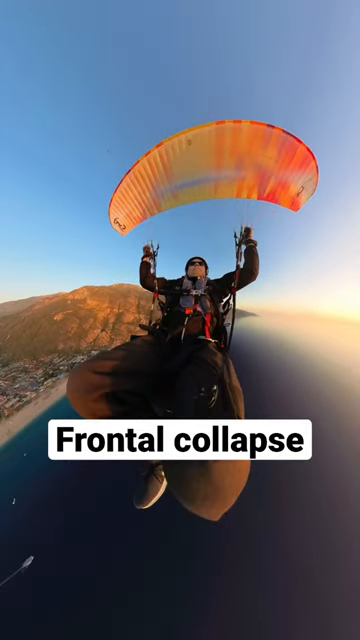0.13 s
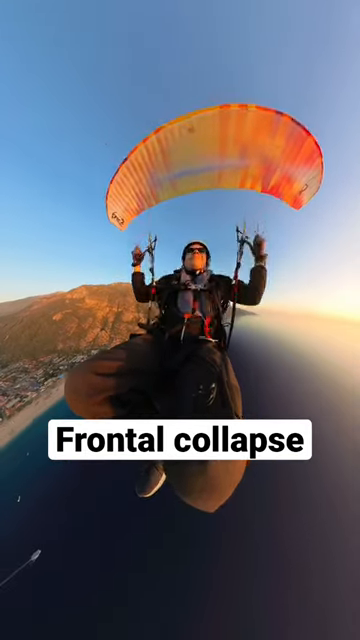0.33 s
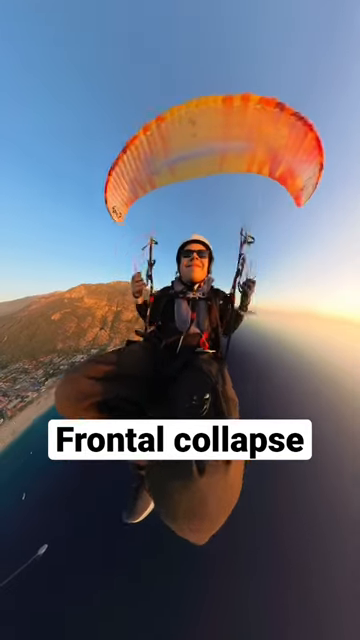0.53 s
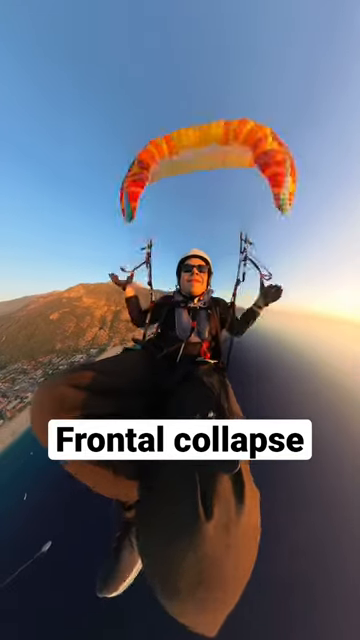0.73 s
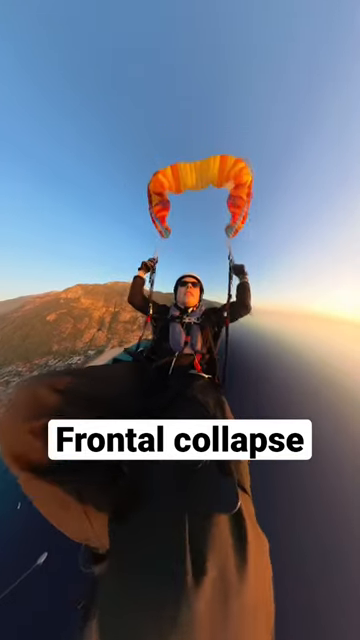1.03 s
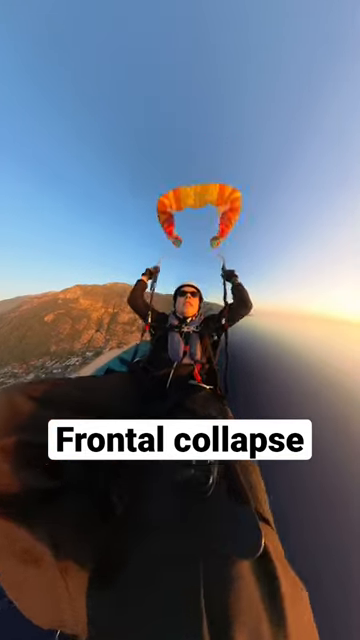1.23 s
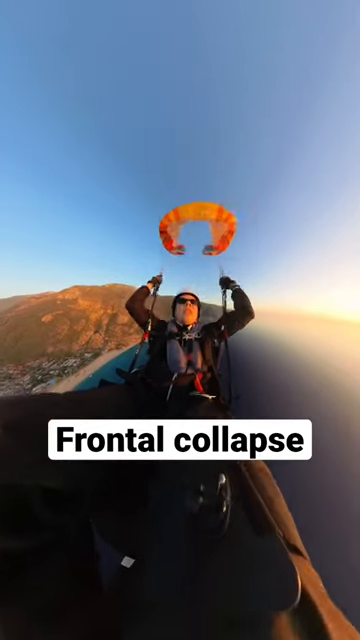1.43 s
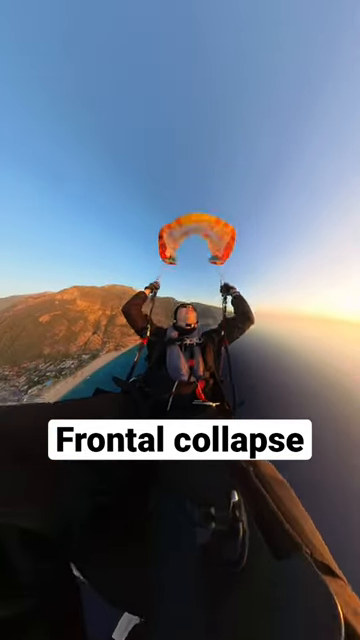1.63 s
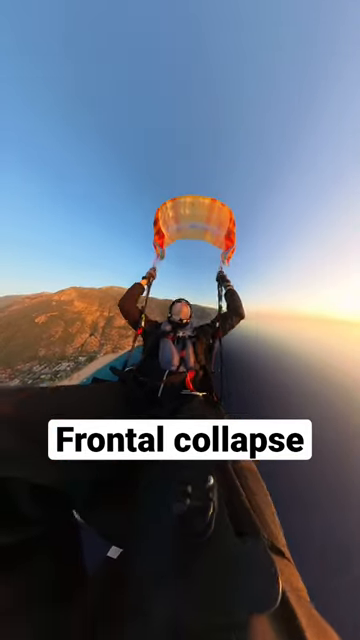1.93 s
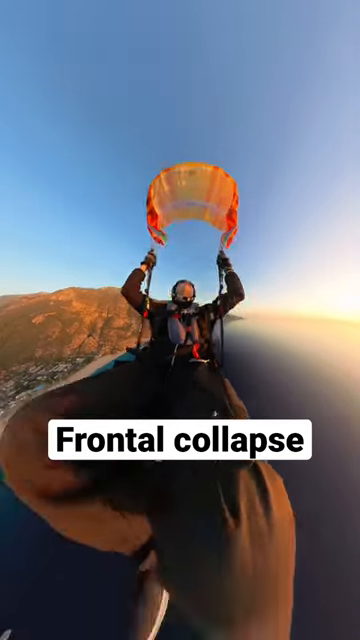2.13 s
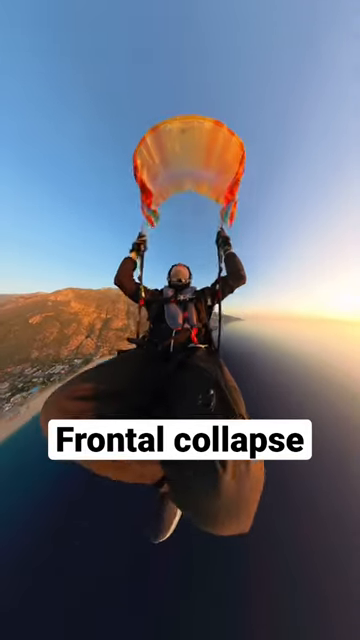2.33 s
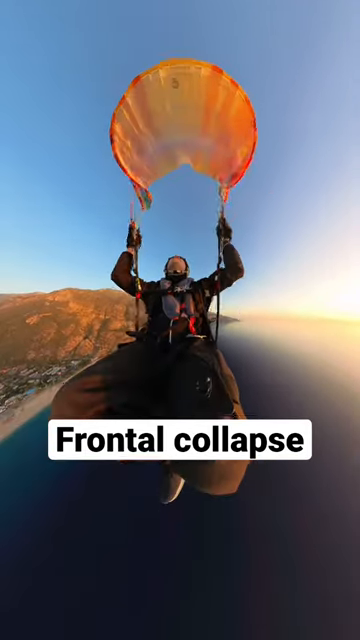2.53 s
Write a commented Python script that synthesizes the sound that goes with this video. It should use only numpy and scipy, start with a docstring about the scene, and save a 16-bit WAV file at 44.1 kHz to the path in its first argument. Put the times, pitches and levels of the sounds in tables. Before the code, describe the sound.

Wind buffets a small microphone throughout, with low rumble, uneven thumps and flutter, its strongest blows rounded off. Short low hums come and go until 0.9 s, with a faint high whistle at 0.6 s and a brief rustle just after. From 0.8 to 1.2 s it turns rough and bright with dense sharp pops. Sparser puffs and pops follow; patchy fabric rustle rises from 1.6 s, strongest 1.9-2.5 s.

```python
"""Wind buffets a small microphone under a paraglider, thumping and fluttering on its port throughout.
Short low hums come and go in the first 0.9 s, with a brief high whistle at 0.6 s and a rustle just after.
From 0.8 to 1.2 s the wind turns rough and bright, crowded with sharp pops; later pops are sparser.
From 1.6 s the wing's fabric rustles in patches overhead as it folds and refills, most from 1.9 to 2.5 s.
Wind is shaped noise and random kicks, puffs are single pressure swings, hums are tones, fabric is hiss."""
import sys
import numpy as np
from scipy import signal
from scipy.fft import rfft, irfft, next_fast_len
from scipy.io import wavfile
from scipy.ndimage import uniform_filter1d, map_coordinates

SR = 44100
rng = np.random.default_rng(int(sys.argv[2]) if len(sys.argv) > 2 else 0)


def voltage_ratio(decibels):
    """Convert decibels (scalar or array-like) to amplitude ratios, 20 dB per decade."""
    exponent = np.asarray(decibels, float) / 20
    return 10 ** exponent


def log_audio(samples):
    """Write samples as a 16-bit WAV file to the path given in sys.argv[1]."""
    # one column per channel
    frames = np.atleast_2d(samples).T
    # limit to full scale, then quantise
    limited = np.clip(frames, -1, 1)
    pcm = np.round(limited * 32767).astype(np.int16)
    wavfile.write(sys.argv[1], SR, pcm)


N = 119070  # length in samples, 2.7 s
CRACK_S = .0015  # spread of one crack, seconds

# How strongly the wind buffets the port.
# Each row: time in seconds, thump level and flutter level in dB, before a fixed trim of each.
WIND_LEVELS = [(0.06, -19, -72), (0.29, -29.5, -31.5), (0.33, -17.5, -38.5), (0.355, -22, -42),
               (0.37, -19.5, -15.5), (0.42, -16.5, -24.5), (0.43, -21.5, -53), (0.55, -23, -40),
               (0.63, -25.5, -32.5), (0.69, -17.5, -22), (0.73, -21.5, -35), (0.82, -18.5, -24.5),
               (0.99, -22.5, -20.5), (1.12, -19, -23.5), (1.15, -31.5, -19), (1.21, -32.5, -34.5),
               (1.26, -21, -44), (1.29, -31, -55), (1.35, -16.5, -19.5), (1.38, -32.5, -81),
               (1.4, -53, -15.5), (1.43, -24.5, -64), (1.49, -26.5, -52), (1.52, -28, -27),
               (1.54, -26, -63), (1.6, -16.5, -30.5), (1.64, -27, -54), (1.65, -24, -45),
               (1.68, -25.5, -35), (1.69, -37, -41), (1.74, -19.5, -36), (1.92, -22, -24),
               (1.99, -25.5, -27.5), (2.0, -31, -37), (2.02, -20.5, -18.5), (2.06, -34.5, -43),
               (2.14, -17.5, -26), (2.24, -33.5, -38), (2.26, -21, -33), (2.29, -51, -34.5),
               (2.31, -22.5, -31), (2.33, -26, -49), (2.38, -37, -28), (2.44, -19, -28.5), (2.47, -18, -36),
               (2.49, -30, -31.5), (2.53, -20.5, -38), (2.54, -15.5, -38), (2.57, -20.5, -12.5),
               (2.69, -23.5, -30.5), (2.7, -27.5, -28)]
# How strong the sharp edge of the turbulence is. Each row: time in seconds, level in dB.
EDGE_LEVELS = [(0, -70), (.35, -68), (.37, -52), (.41, -58), (.44, -68), (.66, -66), (.7, -58), (.73, -68),
               (.785, -64), (.81, -47), (.86, -52), (.89, -46), (1.05, -45), (1.14, -45), (1.17, -53),
               (1.2, -70), (1.8, -62), (1.94, -50), (2, -62), (2.5, -66), (2.58, -49), (2.65, -60),
               (2.7, -52)]
# How strong the low rumble is. Each row: time in seconds, level in dB.
RUMBLE_LEVELS = [(.1, -31), (.35, -31), (.46, -40), (.58, -32), (.67, -35), (.8, -24), (.88, -31),
                 (1.1, -33), (1.22, -36), (1.34, -29), (1.66, -29), (1.98, -32), (2.05, -43), (2.14, -33),
                 (2.35, -38), (2.45, -30), (2.7, -36)]
# Tone colour of the rumble. Each row: frequency in Hz, relative level in dB.
RUMBLE_COLOUR = [(18, -41.5), (27, -23), (40, 0), (60, -2), (100, -5.5), (140, -11), (220, -66)]
# Tone colour of the thump from big eddies. Each row: frequency in Hz, relative level in dB.
THUMP_COLOUR = [(50, -15.5), (90, -6.5), (130, -4.5), (165, -1.5), (230, -7.5), (400, -14.5), (800, -33.5),
                (1600, -62.5)]
# Tone colour of the flutter from smaller eddies. Each row: frequency in Hz, relative level in dB.
FLUTTER_COLOUR = [(120, -2), (250, 1), (400, -0.5), (650, -7), (1000, -12), (1400, -22.5), (2000, -37.5),
                  (3000, -53), (6000, -77.5)]
# Tone colour of the sharp cracks. Each row: frequency in Hz, relative level in dB.
SHARP_COLOUR = [(500, -20), (900, 0), (1300, -1), (1700, -4), (2500, -11), (3500, -19), (4500, -27),
                (6000, -38), (9000, -56)]
# Tone colour of the steady air noise. Each row: frequency in Hz, relative level in dB.
HUSH_COLOUR = [(600, -2.5), (1200, 11), (2000, -1), (3200, -6.5), (5000, -23.5), (8000, -30)]


def buffeting():
    """Eddies of all sizes share their arrival; the small ones come as sharp kicks, each with a brief crack."""
    thump_db, flutter_db = curves(WIND_LEVELS)
    rumble_db, = curves(RUMBLE_LEVELS)
    edge_db, = curves(EDGE_LEVELS)
    fast = np.tanh(wobble(60))  # shared quick swell and fade, between -1 and 1
    kicks = eddies()

    rumble = voltage_ratio(rumble_db) * lumpy(RUMBLE_COLOUR, 0)
    hush = voltage_ratio(-63) * lumpy(HUSH_COLOUR, .8 * fast)

    big_eddies = voltage_ratio(2.2 * fast) * gliding(lumpy(THUMP_COLOUR, 0))
    low_kicks = unit(colour(kicks * voltage_ratio(fast), THUMP_COLOUR))
    thump = voltage_ratio(thump_db - 1.5) * unit(big_eddies + low_kicks)

    flutter = voltage_ratio(flutter_db - 4.5) * unit(colour(kicks * voltage_ratio(3.9 * fast), FLUTTER_COLOUR))

    # every kick opens a short bell of noise
    bell = np.exp(-.5 * (np.arange(-300, 301) / SR / CRACK_S) ** 2)
    crack_size = np.convolve(np.abs(kicks) ** 1.6, bell, "same")
    cracks = unit(crack_size * rng.standard_normal(N))
    edge = voltage_ratio(edge_db) * unit(colour(cracks * voltage_ratio(3.5 * fast), SHARP_COLOUR))
    return rumble + hush + thump + flutter + edge


def eddies():
    """Irregular train of pressure kicks, mostly of one sign, over a share of smooth turbulence."""
    per_s, range_db, noise_share = 260, 11, 0.35
    gap, size, sign = rng.random((3, 3000))
    at = np.cumsum((.4 + 1.2 * gap) * SR / per_s).astype(int)
    # the high power makes large kicks rare
    kicks = voltage_ratio(range_db * size ** 5.3) * np.where(sign < .72, 1, -1)
    return unit(np.bincount(at, kicks, N)[:N]) + noise_share * rng.standard_normal(N)


# Size of the big eddies, heard as the centre of the thump. Each row: time in seconds, centre in Hz.
THUMP_PITCH_HZ = [(0, 161), (.3, 134.7), (.55, 179.9), (.68, 170), (.8, 104.7), (.95, 144.7), (1.3, 135.1),
                  (1.9, 170), (2.55, 169.8)]


def gliding(x):
    """x played faster or slower, so that the thump follows its pitch."""
    hz, = curves(THUMP_PITCH_HZ)
    normal_hz = 165  # played at normal speed at this pitch
    return map_coordinates(x, [np.cumsum(hz / normal_hz)], mode="mirror")


# Single puffs on the port. Each row: time of the peak in seconds, peak in dB, pitch in Hz,
# spread of the burst of finer eddies in seconds, burst relative to the peak in dB, before its band gains.
PUFF_EVENTS = [(0.042, -5, 184.4, 0.0022, -41.5), (.19, -11, 144, 0.0036, -54),
               (0.325, -15, 170, 0.0036, -41), (0.369, -12, 297, 0.0096, -29),
               (0.706, -14, 250, 0.0042, -25.5), (0.791, -12, 170, 0.0023, -36),
               (.803, -12, 222, 0.0023, -27.5), (0.811, -25, 199, 0.0042, -46),
               (1.0584, -19, 262, 0.0024, -43), (1.064, -7, 197, 0.0026, -35),
               (1.113, -10, 230, 0.0019, -30), (1.336, -9, 240, 0.0033, -29.5),
               (1.407, -16, 395, 0.0019, -19.5), (1.4726, -10.5, 225, 0.003, -57),
               (1.519, -15, 401.3, 0.0056, -30.5), (1.605, -13, 256, 0.0023, -41),
               (1.6175, -13, 260, 0.0025, -42), (1.66, -6, 171.1, 0.0058, -32.5),
               (1.855, -12, 279.6, 0.0049, -34), (1.915, -8.5, 256, 0.001, -22.5),
               (1.933, -11.5, 281.4, .004, -28.5), (1.981, -7.5, 152.8, 0.0076, -44),
               (2.019, -16.5, 216, 0.0027, -31.5), (2.137, -11, 260.1, 0.0052, -33.5),
               (2.308, -5.5, 185, 0.0035, -41.5), (2.465, -11.5, 279.7, 0.0038, -27.5),
               (2.504, -7, 262, 0.0015, -51), (2.526, -6.5, 262, 0.0037, -34),
               (2.679, -10, 398.6, 0.0036, -27)]
# Sharp pops, single small eddies. Each row: time in seconds (the peak is 1.5 ms later),
# peak in dB (the push gets 0.5 dB more), pitch in Hz, crack relative to the listed peak in dB.
POP_EVENTS = [(0.366, -10.5, 503, -44), (0.388, -11, 610, -30), (0.801, -10.5, 592, -33),
              (0.81, -32, 678, -22), (0.825, -13, 730, -15), (0.85, -17, 509.6, -26), (0.88, -14, 576, -26),
              (0.897, -18, 600, -19), (0.905, -11, 620, -24), (0.93, -24.5, 571.4, -7),
              (0.942, -14.5, 940, -24), (0.956, -13, 510, -20), (0.994, -20.5, 1252, -39),
              (1.008, -17.5, 710, -13), (1.021, -22.5, 619, -11), (1.038, -15, 710, -25),
              (1.048, -19, 501, -17), (1.061, -28, 656, -27), (1.102, -17, 730, -14.5),
              (1.11, -22, 505, -7), (1.132, -14.5, 525, -17.5), (1.146, -20, 597.6, -16),
              (1.181, -14.5, 710, -20.5), (1.331, -23, 512.8, -34), (1.34, -17.5, 620, -22.5),
              (1.405, -26, 539.3, -15), (1.659, -14.5, 740, -17.5), (1.673, -16.5, 510, -40),
              (1.847, -22, 519.7, -37), (1.889, -16, 530, -30), (1.91, -18.5, 540.8, -15),
              (2.012, -15, 519.2, -36), (2.112, -15.5, 497, -39), (2.135, -20, 595, -28),
              (2.546, -14.5, 613, -30), (2.557, -22, 780, -24), (2.575, -11.5, 557.5, -46),
              (2.601, -14, 515, -33), (2.609, -14, 620, -34), (2.691, -17.5, 700, -23)]


def puffs():
    """Each puff is a push of pressure in a burst of finer eddies; pops are quicker pushes with a crack."""
    t = np.arange(N) / SR
    push, fine, crack = np.zeros((3, N))
    for s, db, hz, length, burst_db in PUFF_EVENTS:
        push += voltage_ratio(db) * swing(t - s, hz)
        fine += voltage_ratio(db + burst_db) * np.exp(-.5 * ((t - s) / length) ** 2)
    for s, db, hz, crack_db in POP_EVENTS:
        since_peak = t - s - .0015
        push += voltage_ratio(db + 0.5) * swing(since_peak, hz)
        crack += voltage_ratio(db + crack_db) * np.exp(-.5 * (since_peak / CRACK_S) ** 2)
    flutter = voltage_ratio(21.0) * fine * lumpy(FLUTTER_COLOUR, 0)
    sharp = (voltage_ratio(-19) * fine + crack) * lumpy(SHARP_COLOUR, 0)
    return push + flutter + sharp


def swing(t, hz):
    """One push of pressure between two shallow dips."""
    u = (np.pi * hz * t) ** 2
    return (1 - 2 * u) * np.exp(-u)


# Eddies shed regularly for a few cycles, a wavering low tone. Each row: time of the middle in seconds,
# peak of the main tone in dB, pitch at the middle in Hz, glide in Hz per second, spread in seconds.
HUM_EVENTS = [(.078, -14, 168.5, -300, 0.0074), (.156, -21, 161, 1, 0.017), (.255, -20.5, 168, -600, .01),
              (.612, -19.5, 164.4, 96, 0.028), (.688, -14, 170.4, 105, 0.021),
              (.76, -18, 105.3, -900, 0.027), (.838, -18, 148.7, 0, 0.015)]


def hums():
    """Short runs of regular shedding: a gliding tone with a weak octave under a bell."""
    out = np.zeros(N)
    for (s, db, hz, glide, length), start in zip(HUM_EVENTS, rng.random(len(HUM_EVENTS))):
        t = np.arange(N) / SR - s
        cycles = start + hz * t + .5 * glide * t ** 2 + .06 * wobble(40)
        turn = 2 * np.pi * cycles
        bell = np.exp(-.5 * (t / length) ** 2)
        out += voltage_ratio(db) * bell * (np.cos(turn) + 0.22 * np.cos(2 * turn))
    return out


# How strongly the fabric rustles.
# Each row: time in seconds, gain of the whole rustle in dB, extra gain of its lower band in dB.
RUSTLE_LEVELS = [(0.12, -73, -11), (0.33, -64.5, -7), (0.41, -70, -10.5), (0.65, -39.5, -5),
                 (0.69, -51, -6), (0.78, -53.5, -4.5), (0.82, -66, -10), (1.2, -70, -3), (1.63, -48.5, -4),
                 (1.72, -51, -6), (1.92, -42.5, -4), (1.94, -50, -3), (1.95, -38.5, -1.5),
                 (2.02, -52, -5.5), (2.22, -43, 0), (2.25, -51, -3), (2.29, -47.5, -1), (2.32, -54, -1.5),
                 (2.43, -42, 0), (2.43, -38, -1.5), (2.47, -50, -3.5), (2.52, -47, -6.5), (2.63, -60, -3),
                 (2.7, -57, -9)]
# Tone colour of the bright rustle. Each row: frequency in Hz, relative level in dB.
BRIGHT_COLOUR = [(3240, -37.5), (5500, -9), (5920, -11), (6430, -8), (7910, -5), (9780, -1.5), (10800, -1),
                 (12500, -10.5), (15500, -22)]
# Tone colour of the lower rustle. Each row: frequency in Hz, relative level in dB.
LOWER_COLOUR = [(1000, 5), (1800, -0.5), (2500, -1.5), (3200, -3.5), (4000, 4), (5000, -1.5), (6000, -18.5),
                (7500, -63)]


def fabric():
    """Dense rustle of the wing: two bands of noise made patchy in time and pitch."""
    level_db, low_db = curves(RUSTLE_LEVELS)
    crinkle = 1.16 * wobble(29.35) + 0.91 * wobble(150)  # dB
    rustle = lumpy(BRIGHT_COLOUR, crinkle) + voltage_ratio(low_db) * lumpy(LOWER_COLOUR, crinkle)
    # random patches, smoothed over frequency and then over time
    spectrum = signal.stft(rustle, nperseg=512)[2]
    patches = uniform_filter1d(rng.standard_normal(spectrum.shape), size=7, axis=0)
    patches = uniform_filter1d(patches, size=9, axis=1)
    rustle = signal.istft(spectrum * voltage_ratio(2.47 * unit(patches)), nperseg=512)[1][:N]
    return voltage_ratio(level_db) * rustle


def whistle():
    """One brief, high, steady tone that swells and fades under a bell."""
    middle_s, hz, db, spread_s = .605, 8980, -47, .01
    t = np.arange(N) / SR - middle_s
    return voltage_ratio(db) * np.exp(-.5 * (t / spread_s) ** 2) * np.sin(2 * np.pi * hz * t)


def unit(x):
    """Scaled to rms 1."""
    return x / np.sqrt(np.mean(x ** 2) + 1e-20)


def curves(rows):
    """One value per sample for each column after the time, corners rounded."""
    s, *cols = np.transpose(rows)
    t = np.arange(N) / SR
    return [uniform_filter1d(np.interp(t, s, c), size=180) for c in cols]


def wobble(rate):
    """A smooth random curve, rate knots a second."""
    return map_coordinates(rng.standard_normal(1000), [np.arange(N) * rate / SR], mode="wrap")


def colour(x, points):
    """x filtered by (Hz, dB) points on a log axis, nearly silent outside them."""
    m = next_fast_len(N + 8192)
    f, db = np.transpose(points)
    bins = np.log(np.fft.rfftfreq(m, 1 / SR) + 1)
    gain = voltage_ratio(np.interp(bins, np.log(f + 1), db, left=-120, right=-120))
    return irfft(rfft(x, m) * gain, m)[:N]


def lumpy(points, lumps_db):
    """Noise that swells by lumps_db, coloured, rms 1."""
    return unit(colour(rng.standard_normal(N) * voltage_ratio(lumps_db), points))


def scene():
    """Wind on the port and the wing overhead, as one channel."""
    return (buffeting() + puffs() + hums() + fabric() + whistle())[None]


def top_cut(x):
    """Nothing passes above the cut-off."""
    return signal.sosfilt(signal.butter(12, 15630, fs=SR, output="sos"), x)


def record(dry):
    """The small microphone rounds off the strongest blows."""
    top, hard = .62, 3.5  # ceiling of the waveform (full scale is 1), sharpness of the bend
    mix = dry / (1 + np.abs(dry / top) ** hard) ** (1 / hard)
    return top_cut(mix)


dry = scene()
out = record(dry)
log_audio(out)
```